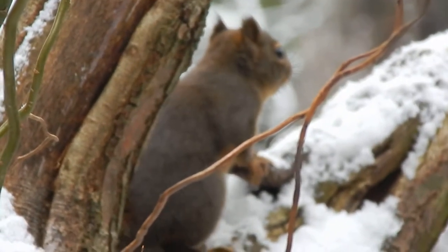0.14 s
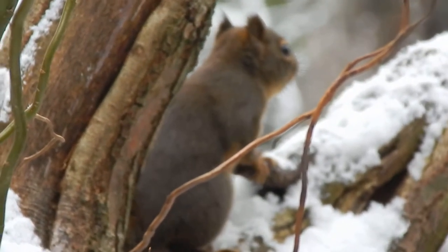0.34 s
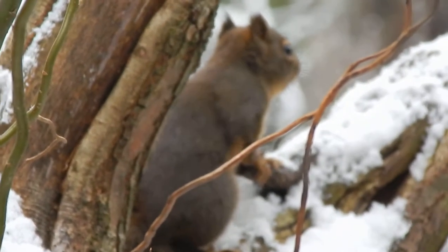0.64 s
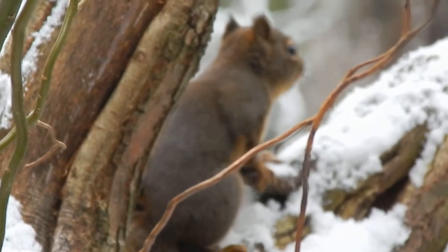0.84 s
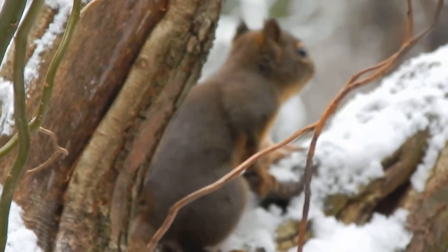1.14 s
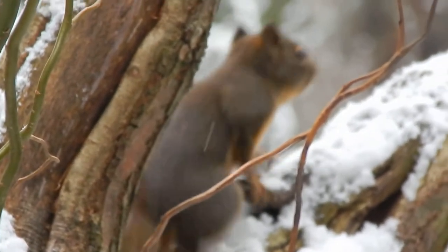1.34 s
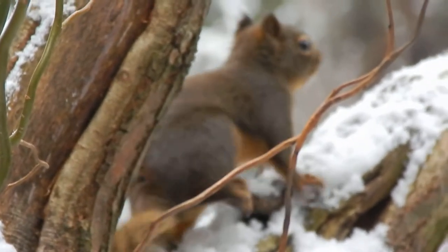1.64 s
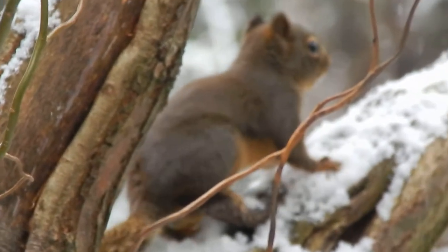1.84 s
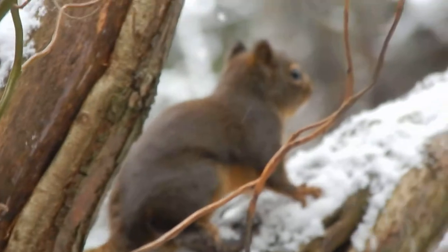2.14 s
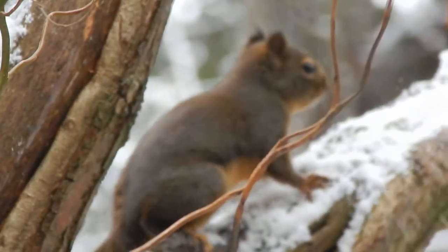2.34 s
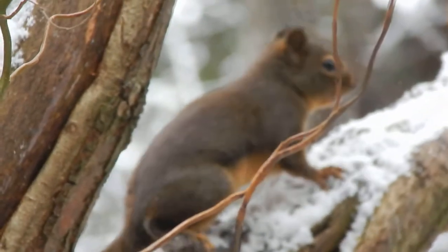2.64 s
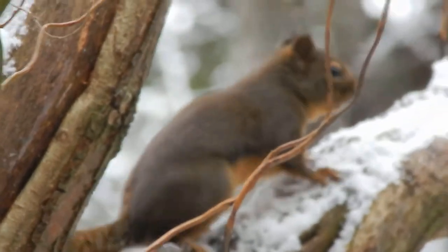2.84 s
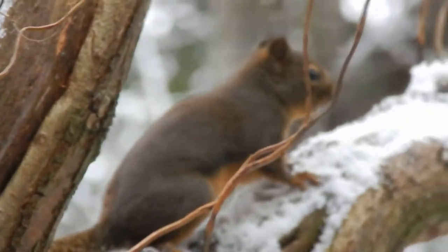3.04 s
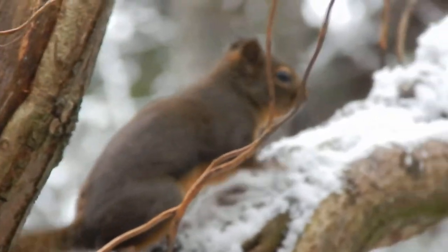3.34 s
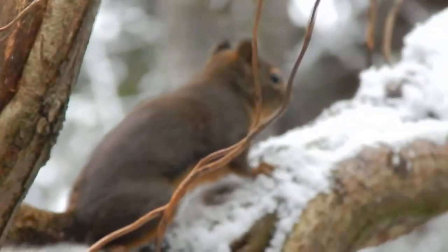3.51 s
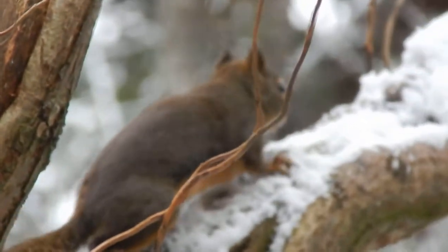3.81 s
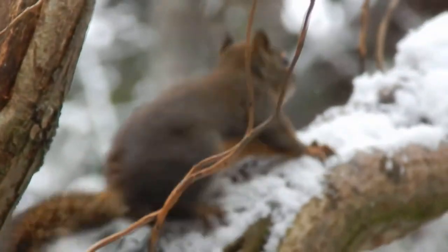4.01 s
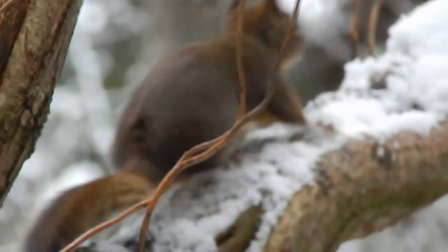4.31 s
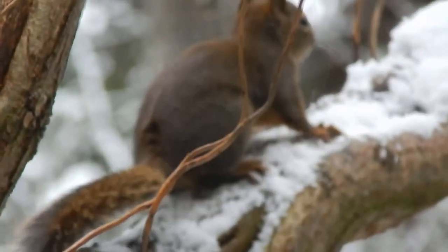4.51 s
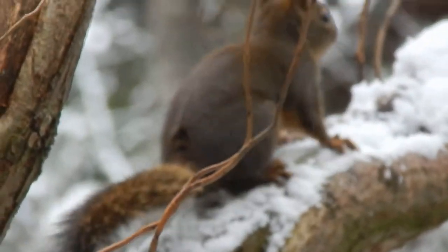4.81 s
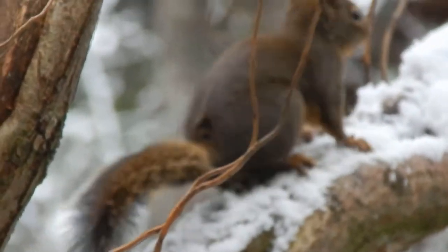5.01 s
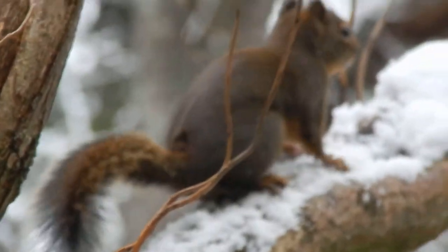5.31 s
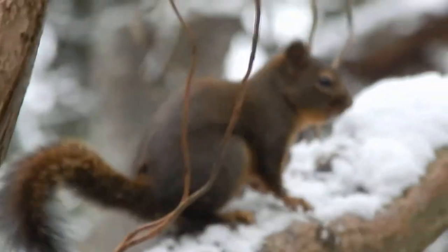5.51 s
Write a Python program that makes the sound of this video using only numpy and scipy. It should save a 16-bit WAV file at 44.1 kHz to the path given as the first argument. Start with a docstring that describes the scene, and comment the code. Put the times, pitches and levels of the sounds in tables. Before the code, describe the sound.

Outdoors among snowy trees, a nearby squirrel keeps up a steady string of about twenty short, piercing chirps, each rising and then diving in pitch with a brief woodland echo. The calls grow slightly stronger toward the middle. Late on, a faint rustle of twigs and snow swells a little and a few tiny claw ticks follow. The microphone also picks up a constant low rumble from a far road.

```python
"""A squirrel on a snowy branch repeats a sharp alarm chirp about three times a second.
Its vocal folds make a clean tone with overtones (harmonics) that arches up in pitch and drops.
As the mouth shuts, only a soft falling whistle is left. Trunks and ground throw the sound back.
Claws tick on the bark, twigs and snow rustle, a far bird peeps once and far traffic rumbles."""
import sys
import numpy as np
from scipy import signal
from scipy.fft import rfft, irfft, next_fast_len
from scipy.io import wavfile
from scipy.ndimage import uniform_filter1d

SR = 44100
rng = np.random.default_rng(int(sys.argv[2]) if len(sys.argv) > 2 else 0)


def persist_wave(psi):
    """Save psi, clipped to +-1, as 16-bit WAV."""
    counts = np.round(np.clip(psi, -1, 1) * 32767).astype(np.int16)
    wavfile.write(sys.argv[1], SR, np.atleast_2d(counts).T)


N = 249606


def squirrel_chirp(top_s, knee_s, end_s, top_hz, knee_hz, end_hz, base_db, second_db, third_db, trail_db):
    """A burst of effort arches the pitch; at the knee, where the dive ends, a soft whistle takes over."""
    high_db = [-42.5, -52.5, -61]  # Levels of harmonics 4, 5 and 6 in dB, before the mouth shapes them.
    fade_factors = [1.5, 2, 4.2, 0.7, 2.7]  # The dB that harmonics 2 to 6 each lose per dB of lost effort.
    start_hz, snap_hz, snap_s = 1975, 2370, 0.00509  # the pitch leaps up as the folds catch
    hold_s, last_drop_hz = 0.00372, 171  # pause at the top; final dip of the whistle
    t = np.arange(0, end_s, 1 / SR)
    rise = np.clip(t / top_s, 0, 1)  # each of these three stages runs from 0 to 1
    fall = np.clip((t - top_s - hold_s) / (knee_s - top_s - hold_s), 0, 1)
    trail = np.clip((t - knee_s) / (end_s - knee_s), 0, 1)

    hz = top_hz - (top_hz - snap_hz) * (1 - rise) ** 1.76 - (snap_hz - start_hz) * np.exp(-t / snap_s)
    dive = 1 - np.cos(np.pi * (0.775 * fall) ** .88)  # tips over, dives, eases off
    hz -= (top_hz - knee_hz) * dive / dive[-1]
    hz -= (knee_hz - end_hz) * trail ** 1.475 + last_drop_hz * trail ** 7
    hz = uniform_filter1d(hz, 100) * (1 + 0.0041 * wander(len(t), 0.0051))
    phase = 2 * np.pi * np.cumsum(hz) / SR

    # Effort is strongest at the top; the later the knee, the lower it sags.
    effort_db = -2.5 * (1 - rise) ** 5.4 - 149 * knee_s * fall ** 3.9
    mouth_open = uniform_filter1d(1 - np.clip(fall + 0.83 * trail - .85, 0, .3) / .3, 200)
    whistle_gain = gain_of(trail_db - 6.2 * (1 - trail) ** 4.3 + 2.1 * wander(len(t), 0.0008))
    base_gain = gain_of(base_db + 6.03 * effort_db + 2.22 * wander(len(t), 0.0052))
    sound = (base_gain * mouth_open + whistle_gain * (1 - mouth_open)) * np.sin(phase)
    for k, (db, fade) in enumerate(zip([second_db, third_db] + high_db, fade_factors), 2):
        flutter_db = 0.78 * k * wander(len(t), 0.0023)  # higher harmonics are less steady
        sound += gain_of(db + fade * effort_db + flutter_db) * mouth_open * np.sin(k * phase)
    breath = signal.lfilter(*signal.butter(2, [7000, 13500], "band", fs=SR), rng.standard_normal(len(t)))
    sound += gain_of(third_db - 6 + 0.57 * effort_db) * mouth_open * breath
    attack = np.clip(t / .0025, 0, 1) ** 2  # the folds snap in
    release = np.clip((end_s - t) / 0.001, 0, 1)
    return sound * attack * release


def mouth_to_microphone(sound):
    """The mouth colours a chirp, which then arrives directly, as near echoes and as a tail of the woods."""
    # What mouth and head pass on. Each row: frequency in Hz, gain in dB.
    mouth = [(1500, 7.5), (2250, 8.5), (2430, 0.5), (2580, 9), (3700, 0.5), (4300, -0.5), (5200, 6.5),
             (6400, -1.5), (7800, 0.5), (8600, 3.5), (10000, 10), (11800, 0), (13200, -3.5), (15700, 3)]
    # Near echoes off branch, trunks and snow. Each row: delay in seconds, left share, right share.
    echoes = [(.0012, -0.064, -0.3), (.0030, -0.2, 0.31), (.0055, -0.076, -0.12), (.009, 0.33, 0.37),
              (.014, -0.076, 0.44)]
    # How the microphone's right opening hears the branch compared with its left.
    # Each row: frequency in Hz, gain in dB, lag in radians.
    right_side = [(1440, -16.5, 0.52), (2360, -5.5, -0.034), (4170, -17, -0.82), (5320, -16, -2.42),
                  (7200, -1.5, 0.94), (9500, -2.5, -0.87), (15400, -1, -1)]
    lead = 400  # samples of silence that keep the filters from wrapping round
    n = next_fast_len(SR)
    hz = np.fft.rfftfreq(n, 1 / SR)
    voice = rfft(np.pad(sound, (lead, 0)), n) * gain_of(curve_at(mouth, hz))
    paths = 1 + sum(np.array([[left], [right]]) * np.exp(-2j * np.pi * hz * s) for s, left, right in echoes)
    right_gain = gain_of(curve_at(right_side, hz)) * np.exp(-1j * curve_at(right_side, hz, column=2))
    near = paths * [np.ones(len(hz)), right_gain]
    return irfft(voice * (near + rfft(woods_echo(), n)), n)[:, lead:]


def woods_echo():
    """Twigs and trunks scatter a sound into many tiny random echoes that die away."""
    # How long the woods ring. Each row: frequency in Hz, seconds to fade by 60 dB.
    ring_times = [(1500, 0.17), (2600, 0.26), (5000, 0.36), (10000, 0.21)]
    # How strongly the woods answer. Each row: frequency in Hz, level in dB against the chirp.
    ring_levels = [(1500, -3), (2600, -7.5), (5000, -18), (7500, -7.5), (10000, -3.5)]
    twigs_db, twigs_fade_s = -10, 0.18  # scatter off the nearest twigs and trunk
    n, density = SR // 2, 0.2
    taps = rng.standard_normal((2, n)) * (rng.random((2, n)) < density)
    taps *= np.clip(np.arange(n) / SR / 0.0035, 0, 1)
    taps *= gain_of(3.14 * wander(n, 0.0054) + 0.5)  # echoes come in clumps, one for each trunk
    hz, t, spectra = signal.stft(taps, SR, nperseg=256)
    fade_s = curve_at(ring_times, hz)[:, None]
    far = gain_of(curve_at(ring_levels, hz)[:, None] - 60 * t / fade_s) / np.sqrt(fade_s)
    near = gain_of(twigs_db - 60 * t / twigs_fade_s) / np.sqrt(twigs_fade_s)
    tail = signal.istft(spectra * np.hypot(far, near), SR, nperseg=256)[1]
    return tail[:, :n] * np.sqrt(6 * np.log(10) / (density * SR))


def claw_tick(peak_db):
    """A claw catches on bark or snow crust with a tiny dry snap."""
    t = np.arange(0, .01, 1 / SR)
    snap = np.diff(rng.standard_normal((2, len(t) + 1))) * np.exp(-t / 0.0011)
    return gain_of(peak_db) * snap / abs(snap).max()


def rustle():
    """A faint high hiss of twigs, snow and microphone that swells as the animal shifts about."""
    spectrum = [(2000, -70), (3400, -1), (4470, -3.5), (4560, 0.5), (5400, -7), (9690, -8.5), (12100, -8),
                (16100, -18)]  # Colour of the hiss. Each row: frequency in Hz, relative level in dB.
    levels = [(0, -62), (1.5, -63), (3.6, -63), (4.0, -60.5), (4.5, -60), (5.1, -60.5), (5.4, -62.5),
              (5.66, -62.5)]  # Its loudness. Each row: time in seconds, level in dB.
    return gain_over_time(levels) * stereo_noise(spectrum)


def bird_peep(length_s, hz, db):
    """A far bird gives one thin peep that bends down at its end."""
    progress = np.arange(0, 1, 1 / (length_s * SR))
    phase = 2 * np.pi * np.cumsum(hz * (1 - 0.18 * progress ** 6)) / SR
    return gain_of(db) * np.sin(phase) * np.sin(np.pi * progress) ** 0.57


def traffic(level_db):
    """A far road makes a steady noise whose bass swells and sinks."""
    spectrum = [(12, -48), (22, -3), (75, 4.5), (105, -2.5), (160, -8), (250, -8.5), (414, -14.5),
                (700, -12.5), (1000, -15.5), (1470, -22.5), (2300, -30), (2900, -34.5), (3600, -42.5),
                (7000, -120)]  # Colour of the road. Each row: frequency in Hz, relative level in dB.
    swell = [(0, -1), (.8, -1), (1.602, -6), (2.298, 1), (3.002, -2.5), (3.8, -0.5), (4.299, -0.5),
             (4.9, -1), (5.66, -4)]  # Swell of the bass. Each row: time in seconds, gain in dB.
    road = gain_of(level_db) * stereo_noise(spectrum)
    bass = signal.filtfilt(*signal.butter(2, 110, fs=SR), road)
    return road + (gain_over_time(swell) - 1) * bass


def stereo_noise(spectrum):
    """Noise of size 1 with a given colour, alike left and right only in the bass."""
    # How alike the two sides are. Each row: frequency in Hz, likeness (1 means the same).
    likeness = [(60, 0.99), (180, 0.97), (550, 0.84), (1650, 0.3), (4970, 0.017), (15000, 0.04)]
    hz = np.fft.rfftfreq(2048, 1 / SR)
    a, b, c, d = rng.standard_normal((N // 512 + 5, 1025, 4)).T
    shared = np.clip(curve_at(likeness, hz), -1, 1)[:, None]
    left = a + 1j * b
    right = shared * left + np.sqrt(1 - shared ** 2) * (c + 1j * d)
    spectra = np.array([left, right]) * gain_of(curve_at(spectrum, hz))[:, None]
    noise = signal.istft(spectra, nperseg=2048, noverlap=1536)[1][:, 1024:N + 1024]
    return noise / noise.std()


def wander(n, smooth_s):
    """Smooth random drift of size 1."""
    width = round(smooth_s * SR)
    drift = uniform_filter1d(uniform_filter1d(rng.standard_normal(n), width), width)
    return drift / drift.std()


def gain_of(db):
    """Turns dB into a factor to multiply by."""
    return 10 ** (np.asarray(db) / 20)


def gain_over_time(points):
    """Joins rows of seconds and dB into one factor for every sample."""
    return gain_of(np.interp(np.arange(N) / SR, *np.transpose(points)))


def curve_at(points, hz, column=1):
    """Reads between the rows of a table, on a log frequency scale."""
    points = np.transpose(points)
    return np.interp(np.log(hz + 1), np.log(points[0] + 1), points[column])


def add(mix, start_s, sound):
    """Lays a sound into the mix, even if it began before time zero."""
    at = round(start_s * SR)
    sound = sound[..., max(-at, 0):]
    part = mix[..., max(at, 0):][..., :sound.shape[-1]]
    part += sound[..., :part.shape[-1]]


def scene():
    """Lays chirps, claw ticks and one peep over the traffic and rustle."""
    # The alarm calls. Each row: start in seconds; seconds from there to the top, knee and end;
    # pitch in Hz at the top, knee and end (before the final dip); levels in dB of the base tone,
    # 2nd harmonic, 3rd harmonic and whistle, before the mouth shapes them.
    chirps = [(-0.027, 0.031, 0.069, 0.11, 2506, 1925, 1560, -33.5, -25, -40, -45.5),
              (0.24, 0.028, 0.068, 0.12, 2550, 2000, 1510, -30.5, -24, -41, -46),
              (0.515, 0.022, 0.057, 0.1, 2572, 1970, 1520, -31.5, -23, -41.5, -46),
              (0.83, 0.036, 0.07, 0.13, 2637, 2055, 1533, -30.5, -22.5, -42.5, -45),
              (1.12, 0.031, 0.063, 0.12, 2575, 2040, 1500, -29, -22, -44.5, -46),
              (1.4, 0.036, 0.083, 0.16, 2586, 2054, 1574, -28, -23, -46, -45.5),
              (1.713, 0.037, 0.076, 0.13, 2643, 2036, 1450, -28, -23, -46, -43),
              (2.009, 0.028, 0.057, 0.13, 2630, 2100, 1410, -27, -25.5, -42, -44),
              (2.289, 0.025, 0.074, 0.11, 2619, 2056, 1420, -25, -23, -42.5, -39.5),
              (2.579, 0.025, 0.057, 0.11, 2615, 2080, 1450, -25.5, -24.5, -43.5, -41),
              (2.873, 0.025, 0.065, 0.115, 2580, 2100, 1466, -26, -23.5, -41.5, -40.5),
              (3.145, 0.02, 0.06, 0.12, 2554, 2065, 1610, -26, -24, -38.5, -42),
              (3.414, 0.025, 0.058, 0.11, 2540, 2045, 1486, -25, -25, -40, -43),
              (3.672, 0.025, 0.07, 0.13, 2593, 1978, 1570, -26.5, -24, -46, -43.5),
              (4.007, 0.044, 0.074, 0.15, 2580, 1990, 1640, -25.5, -24, -46, -42.5),
              (4.336, 0.036, 0.074, 0.13, 2634, 1998, 1626, -27.5, -27.5, -51.5, -42.5),
              (4.646, 0.039, 0.079, 0.1, 2602, 2050, 1440, -28.5, -26.5, -48, -42),
              (4.939, 0.043, 0.067, 0.11, 2677, 2060, 1505, -30.5, -27, -47, -43.5),
              (5.218, 0.027, 0.064, 0.12, 2609, 2126, 1650, -28.5, -26, -44.5, -44),
              (5.472, 0.044, 0.081, 0.12, 2652, 2008, 1584, -28.5, -26, -45, -40)]
    ticks = [(4.554, -52), (4.8384, -40), (5.1444, -54), (5.1831, -51)]  # Claws on bark and crust. Each row: start in seconds, peak level in dB.
    mix = traffic(level_db=-36.5) + rustle()
    for start_s, *shape in chirps:
        add(mix, start_s, mouth_to_microphone(squirrel_chirp(*shape)))
    for start_s, peak_db in ticks:
        add(mix, start_s, claw_tick(peak_db))
    add(mix, 3.628, bird_peep(length_s=0.036, hz=4000, db=-60))
    return mix


def record(dry):
    """Cuts away the very highest treble."""
    cutoff_hz = 15950
    lowpass = signal.firwin(511, cutoff_hz, window=("kaiser", 9), fs=SR)
    return signal.oaconvolve(dry, lowpass[None], "same")


dry = scene()
out = record(dry)
persist_wave(out)
```